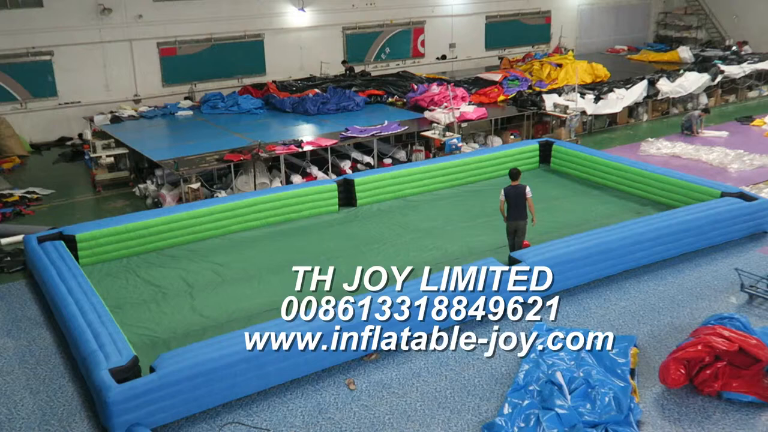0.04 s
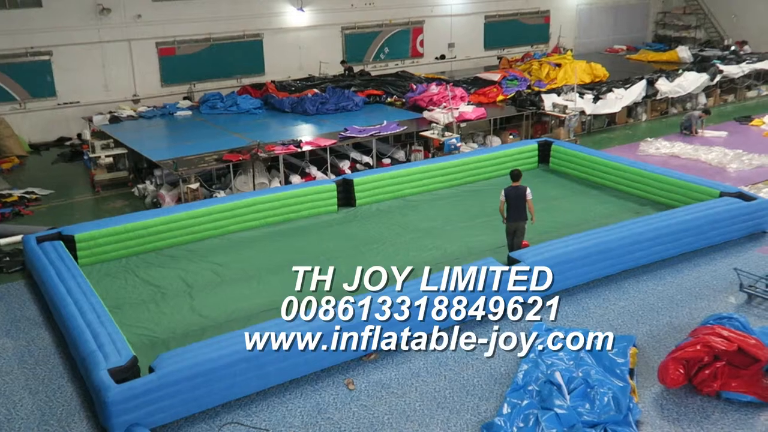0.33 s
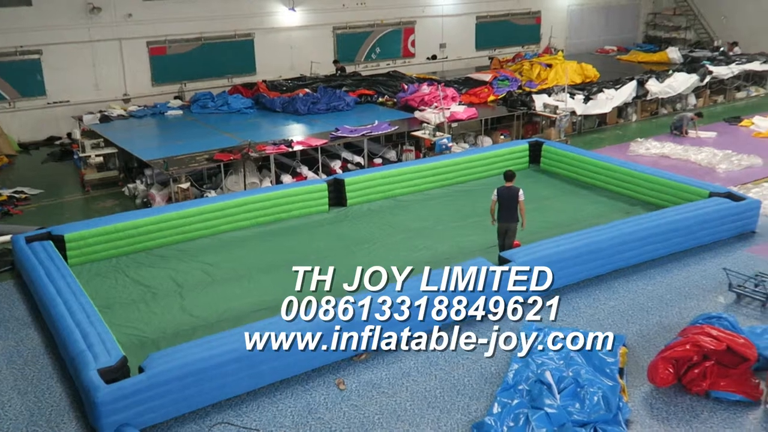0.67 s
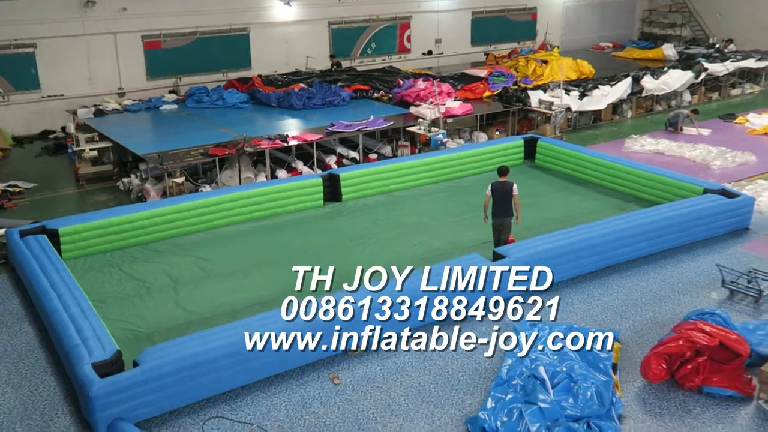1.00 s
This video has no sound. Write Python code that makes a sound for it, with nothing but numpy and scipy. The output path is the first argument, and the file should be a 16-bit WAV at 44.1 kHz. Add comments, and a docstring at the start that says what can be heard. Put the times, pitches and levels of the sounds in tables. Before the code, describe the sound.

An electric blower roars steadily in a hall, with two rushes of air swelling over it.

```python
"""Blower filling an inflatable

An electric blower roars in a workshop hall as it fills a large inflatable, its fan humming and whining.
Twice a hollow rush of air swells and eases, the second time into a thin whistle.
At the start a draught buffets the microphone for a moment."""
import sys
import numpy as np
from scipy import signal
from scipy.io import wavfile
from scipy.ndimage import uniform_filter1d

SR = 44100
rng = np.random.default_rng(int(sys.argv[2]) if len(sys.argv) > 2 else 0)


def generate_wav(sig):
    """Save sig (samples, or channels by samples) to the path in sys.argv[1] as 16-bit PCM at SR."""
    pcm = np.round(np.clip(np.atleast_2d(sig).T, -1, 1) * 32767).astype(np.int16)
    wavfile.write(sys.argv[1], SR, pcm)


N = 176400
FRAME, HOP = 2048, 512
BINS = np.fft.rfftfreq(FRAME, 1 / SR)
FRAME_S = np.arange(N // HOP + 3) * HOP / SR
TIME = np.arange(N) / SR

# The blower's roar out in the hall. Each row: frequency in Hz, relative density in dB.
ROAR_SPECTRUM = [(25, -42), (45, -32), (75, -23), (115, -24), (170, -6.5), (350, -6.5), (660, -8.5),
                 (850, -9), (1300, -10.5), (2000, -12.5), (3200, -16.5), (5500, -20.5), (9000, -24),
                 (12500, -21.5)]
# Resonances of the housing and duct. Each row: centre in Hz, width in Hz, lift in dB.
HOUSING_RESONANCES = [(215.6, 6.7, 11), (278, 24, 4.5), (290.2, 25.4, 11), (499, 18, 9), (726, 30, 4.5),
                      (825, 32, 7.5), (924, 37, 5.5), (1020, 40, 4.5), (1570, 100, 4.5), (2000, 49, 2.5)]
# The sway of the whole roar. Each row: time in seconds, gain in dB.
ROAR_LEVEL = [(.1, -0.6), (.55, 0.3), (.85, -0.5), (1.15, 0), (1.6, 0), (2.1, -0.85), (2.6, -1), (3.3, 0.1),
              (3.9, 0.85)]
# The further sway of its low drone. Each row: time in seconds, gain in dB.
DRONE_LEVEL = [(.45, 1), (.75, 0), (1.15, .5), (2.08, 1), (2.33, 1.5), (2.75, .8), (2.97, 0), (3.33, 2.8),
               (3.55, -0.5), (3.88, 3)]
# Shaft orders, mains hum and blade whine. Each row: frequency in Hz, level in dB.
FAN_TONES = [(45.5, -60), (94, -60), (100, -50), (141, -40.5), (301, -42), (845.5, -37.5), (944, -38),
             (1078, -42)]
# Two rushes of air. Each row: width of the hollow resonance in Hz, upper resonance in Hz, its level
# against the hiss in dB, curve. Each curve row: time in seconds, hiss level in dB,
# level of the hollow resonance in dB, its pitch in Hz.
AIR_RUSHES = [ (490, 3122, -8.5, [(.85, -42, -55, 1050), (.98, -25, -38, 1100), (1.08, -24, -24.5, 1200),
              (1.19, -24.5, -18.5, 1200), (1.29, -24, -23, 1200), (1.42, -29.5, -26, 1280),
              (1.6, -40, -37, 1230), (1.8, -35, -47, 1200)]), (367, 2400, -13, [(2.12, -42, -46, 1150),
              (2.31, -26.5, -26, 1260), (2.44, -22.5, -23.5, 1330), (2.56, -22.3, -18, 1320),
              (2.68, -22.3, -22, 1340), (2.8, -20, -22, 1420), (2.95, -23.5, -22.5, 1390),
              (3.12, -23, -22.5, 1295), (3.3, -21.5, -23.5, 1270), (3.48, -23, -25.5, 1320),
              (3.62, -24, -32, 1310), (4.0, -24, -44, 1280)])]
# The hiss of a rush. Each row: frequency in Hz, relative density in dB.
HISS_SPECTRUM = [(120, -20), (270, 1), (450, -4.5), (750, -0.5), (1200, -3), (1800, -1), (2300, -0.5),
                 (3100, -1.5), (4500, -5.5), (6500, -9.8), (9000, -15.5), (13000, -18)]
# The whistle in the second rush. Each row: time in seconds, level in dB.
WHISTLE_LEVEL = [(2.28, -47), (2.48, -31), (2.78, -30.5), (3.15, -28), (3.5, -33.5), (4.0, -30.5)]
# Its pipe-like modes. Each row: centre in Hz, width in Hz, relative level in dB.
PIPE_MODES = [(1194, 42, 0.5), (2433, 46, -2), (3010, 76, -8), (3680, 63, -10), (4963, 49, -13)]
# The draught right on the microphone. Each row: frequency in Hz, relative density in dB.
BUFFET_SPECTRUM = [(15, -5), (35, 3), (70, -7.5), (140, 0), (220, 0.5), (400, -8), (620, -17), (1000, -39)]
# The strength of that gust. Each row: time in seconds, level in dB.
GUST_LEVEL = [(.08, -20), (.135, -14.5), (.215, -21), (.245, -22), (.298, -17), (.32, -20), (.335, -37)]
# Stereo width at the microphone. Each row: frequency in Hz, side minus mid in dB.
STEREO_WIDTH = [(60, -21), (160, -61.5), (440, -44.5), (710, -30.5), (1170, -23), (1930, -18),
                (3160, -11.5), (5190, -5.5), (8520, 1), (14000, 11)]


def roar(level_db=-19.5, drone_top_hz=375):
    """Churning air rings the blower housing and fills the hall; it sways in level, its low drone too."""
    sway_db = np.interp(TIME, *np.transpose(ROAR_LEVEL))
    drone_db = np.interp(FRAME_S, *np.transpose(DRONE_LEVEL)) / (1 + (BINS[:, None] / drone_top_hz) ** 6)
    spectrum = colour(ROAR_SPECTRUM, HOUSING_RESONANCES) * amp(drone_db)
    return amp(level_db + sway_db) * turbulence(spectrum)


def fan_tones(waver_hz=2.4, flutter_db=4):
    """The fan hums and whines over the roar, each line wavering a little in pitch and level."""
    tones = np.zeros(N)
    for hz, db in FAN_TONES:
        pitch_hz = np.interp(TIME, FRAME_S, hz + waver_hz * drift(FRAME_S, 8.3))
        turns = np.cumsum(pitch_hz) / SR
        flutter = amp(flutter_db * np.interp(TIME, FRAME_S, drift(FRAME_S, 20)))
        tones += amp(db) * unit(flutter * np.sin(2 * np.pi * turns))
    return tones


def rushes(dull_hz=6000, dull_db_per_s=1.5):
    """Air flow swells and eases: a slowly dulling hiss and a hollow resonance that arches in pitch."""
    treble = np.minimum(BINS[:, None] / dull_hz, 1) ** 2
    power = 0
    for hollow_width, upper_hz, upper_db, curve in AIR_RUSHES:
        times, hiss_db, hollow_db, hollow_hz = np.transpose(curve)
        dulling = amp(-dull_db_per_s * treble * np.maximum(FRAME_S - times[0], 0))
        hiss = swell(times, hiss_db) * dulling
        upper = amp(upper_db) * peak(upper_hz, width=270)
        hollow = swell(times, hollow_db) * peak(np.interp(FRAME_S, times, hollow_hz), hollow_width)
        power += hollow ** 2 + hiss ** 2 * (colour(HISS_SPECTRUM) ** 2 + upper ** 2)
    return turbulence(np.sqrt(power))


def whistle():
    """Strong flow sets the pipe modes whistling: narrow, breathy lines that hold their pitch."""
    modes = np.sqrt(sum((amp(db) * peak(hz, width)) ** 2 for hz, width, db in PIPE_MODES))
    return turbulence(modes * swell(*np.transpose(WHISTLE_LEVEL)))


def draught():
    """One unbroken gust rumbles right on the microphone, flares and stops."""
    level_db = np.interp(TIME, *np.transpose(GUST_LEVEL))
    envelope = amp(level_db) * (TIME < GUST_LEVEL[-1][0])
    rumble = turbulence(colour(BUFFET_SPECTRUM))
    return unit(envelope * rumble) * np.sqrt(np.mean(envelope ** 2))


def turbulence(magnitude, hall_ripple_db=2.5, patch_db=1.11, wander_db=0.25):
    """Stereo air noise of the given short-time spectrum, patchy in time and combed by hall reflections."""
    framing = dict(nperseg=FRAME, noverlap=FRAME - HOP)
    white = rng.standard_normal((2, N + 2 * FRAME))
    noise = signal.stft(white, **framing)[2][:, :, :len(FRAME_S)]
    width = amp(at_bins(STEREO_WIDTH))[:, None]
    ripple_db = hall_ripple_db * np.minimum(BINS / 2000, 1)[:, None]
    comb = amp(ripple_db * rng.standard_normal((2, len(BINS), 1)))
    mid, side = comb * np.array([noise[0], noise[1] * width]) / np.sqrt(1 + width ** 2)
    patches = uniform_filter1d(rng.standard_normal(mid.shape), size=24, axis=0)  # across frequency
    patches = unit(uniform_filter1d(patches, size=7, axis=1))  # across time
    gain = magnitude * amp(patch_db * patches + wander_db * drift(FRAME_S, 2.49))
    return signal.istft(np.array([mid + side, mid - side]) * gain, **framing)[1][:, :N]


def colour(points, resonances=()):
    """A smooth spectrum lifted by resonances, as a column with unit power."""
    lift = sum((amp(db) ** 2 - 1) / (1 + ((BINS - hz) / (width / 2)) ** 2) ** 2
               for hz, width, db in resonances)
    return unit(amp(at_bins(points)) * np.sqrt(1 + lift))[:, None]


def peak(hz, width):
    """The spectrum of one steep resonance, still or moving, with unit power."""
    return unit(1 / (1 + ((BINS[:, None] - hz) / (width / 2)) ** 2))


def swell(times, level_db):
    """Gain per frame along a level curve, silent before its first point."""
    return amp(np.interp(FRAME_S, times, level_db)) * (FRAME_S > times[0])


def drift(t, top_hz):
    """Slow random wandering of unit size."""
    rates = np.geomspace(top_hz / 10, top_hz, num=16)
    return unit(sum(np.sin(2 * np.pi * (hz * t + rng.random())) / np.sqrt(hz) for hz in rates))


def at_bins(points):
    """A table's value at every bin, interpolated on a log-frequency axis."""
    hz, value = np.transpose(points)
    return np.interp(np.log(BINS + 1), np.log(hz + 1), value)


def amp(db):
    """Decibels to gain."""
    return 10 ** (np.asarray(db) / 20)


def unit(x):
    """Scales to an rms of one."""
    return x / np.sqrt(np.mean(x ** 2) + 1e-20)


def scene():
    """Blower, rushing air and whistle in the hall, with the draught on the microphone."""
    return roar() + fan_tones() + rushes() + whistle() + draught()


def record(dry, start_s=0.0817, rise_s=0.0026, top_hz=12900):
    """The microphone opens abruptly, and the highest treble is cut off."""
    opened = dry * np.clip((TIME - start_s) / rise_s, 0, 1)
    lowpass = signal.firwin(511, top_hz, window=("kaiser", 9), fs=SR)
    return signal.oaconvolve(opened, lowpass[None], "same")


dry = scene()
out = record(dry)
generate_wav(out)
```